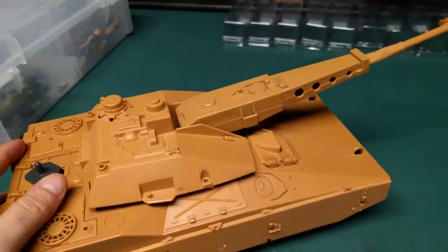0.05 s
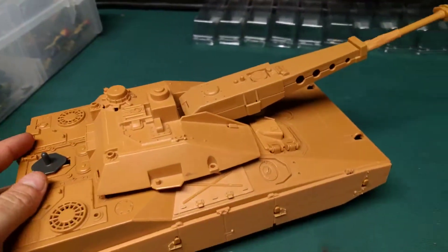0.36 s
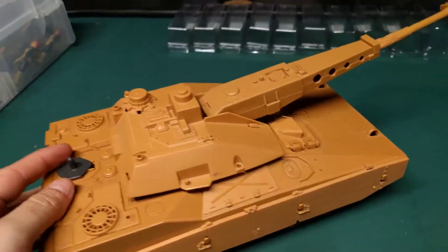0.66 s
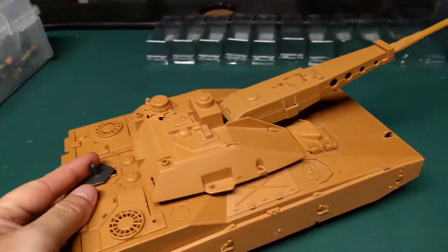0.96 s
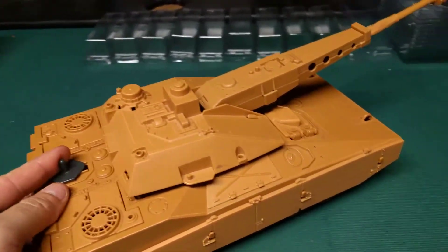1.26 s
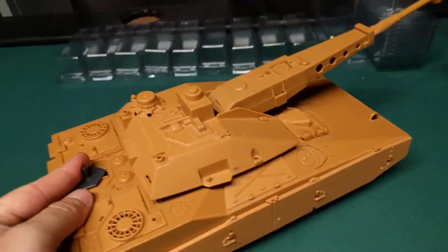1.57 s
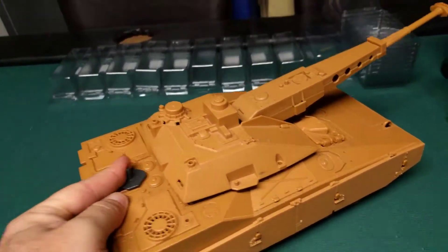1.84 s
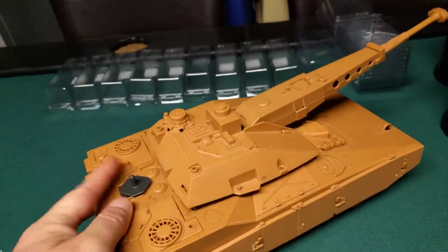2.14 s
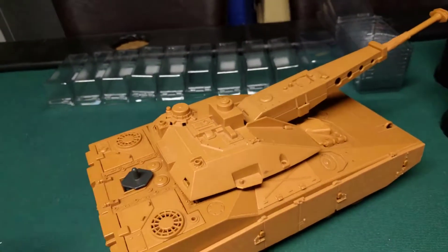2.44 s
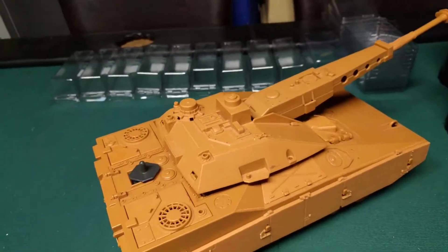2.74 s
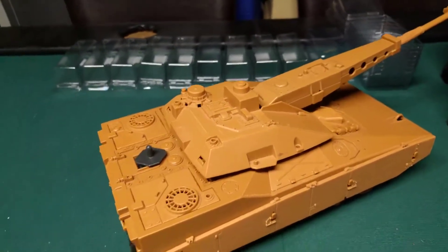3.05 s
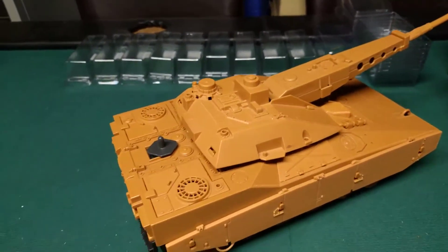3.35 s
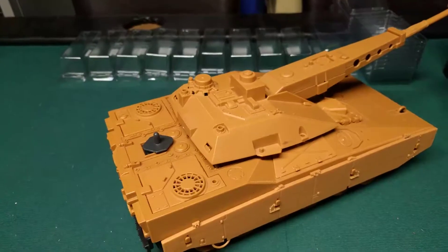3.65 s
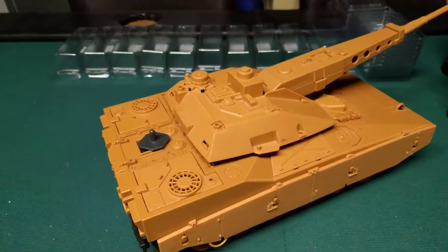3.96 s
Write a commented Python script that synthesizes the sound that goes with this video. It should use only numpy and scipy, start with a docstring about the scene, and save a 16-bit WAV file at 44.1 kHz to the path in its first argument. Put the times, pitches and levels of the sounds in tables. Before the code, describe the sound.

A toy tank's motor whirrs and rattles, then stops with a few plastic clicks.

```python
"""The gearbox of a plastic toy tank, which crawls over a table mat, held back by a hand. Its gear wheel
turns about 50 times a second: the meshes whine at their tooth rates, the tooth impacts excite the hollow
hull, and a tight spot binds and knocks once a turn. The motor is switched off and runs down, the switch
and loose parts click as the hand lets go, and a low room rumble remains."""
import sys
import numpy as np
from scipy import signal
from scipy.fft import rfft, irfft
from scipy.io import wavfile
from scipy.ndimage import uniform_filter1d

SR = 44100
rng = np.random.default_rng(int(sys.argv[2]) if len(sys.argv) > 2 else 0)


def inscribe(sig):
    """Save sig as 16-bit PCM at rate SR to the path in sys.argv[1].

    A 1-D sig is mono; a 2-D sig holds one channel per row.
    Samples are clipped to [-1, 1] before scaling.
    """
    pcm = np.round(np.clip(np.atleast_2d(sig).T, -1, 1) * 32767)
    wavfile.write(sys.argv[1], SR, pcm.astype(np.int16))


N = 176400
T = np.arange(N) / SR


def from_db(db):
    """Amplitude ratio of a level in decibels."""
    return 10 ** (np.asarray(db) / 20)

def rms_one(x):
    """Normalisation to unit rms."""
    return x / np.sqrt(np.mean(x ** 2) + 1e-20)

def in_time(rows):
    """Linear interpolation of each column against the first, t/s."""
    times, *columns = np.transpose(rows)
    return [np.interp(T, times, column) for column in columns]

def gaussian(x, sigma):
    """Gaussian envelope of unit height."""
    return np.exp(-.5 * (x / sigma) ** 2)

def lowpass(x, hz):
    """Second-order Butterworth low-pass."""
    return signal.sosfilt(signal.butter(2, hz, fs=SR, output="sos"), x)

def drift(hz):
    """Random modulation: low-passed noise of unit rms."""
    return rms_one(lowpass(rng.standard_normal(N + SR), hz)[SR:])

def resonate(x, hz, width_hz):
    """Forced response of a damped oscillator, at unit rms."""
    r = np.exp(-np.pi * width_hz / SR)
    feedback = [1, -2 * r * np.cos(2 * np.pi * hz / SR), r * r]
    return rms_one(signal.lfilter([1, 0, -1], feedback, x))

def tail(t60):
    """Free decay of densely spaced modes: exponentially damped noise of unit energy."""
    ring = rng.standard_normal(SR // 2) * from_db(-60 * T[:SR // 2] / t60)
    return ring / np.linalg.norm(ring)

def colour(x, points, modes=(), band_hz=None):
    """Minimum-phase filter through (f/Hz, gain/dB) points, with Lorentzian modes and a pass band."""
    hz = np.maximum(np.arange(N + 1) * SR / (2 * N), 1)
    point_hz, point_db = np.transpose(points)
    db = np.interp(np.log(hz), np.log(point_hz), point_db)
    for centre, width, gain in modes:
        db += gain / (1 + (2 * (hz - centre) / width) ** 2)
    if band_hz:
        loss = (1 + (band_hz[0] / hz) ** 12) * (1 + (hz / band_hz[1]) ** 12)
        db -= 10 * np.log10(np.minimum(loss, 1e7))
    cepstrum = irfft(np.log(from_db(db)))[:N]
    cepstrum[1:] *= 2  # a one-sided cepstrum makes the response causal
    return irfft(rfft(x, 2 * N) * np.exp(rfft(cepstrum, 2 * N)))[:N]


# Spectrum of the room noise: f/Hz, relative spectral level/dB
ROOM_SPECTRUM = [(22, -40), (55, -2), (85, -0.5), (130, -3.5), (200, -7.5), (280, -12.5), (390, -21),
                 (580, -20), (1050, -26), (1700, -28.5), (4200, -35), (9000, -39.5), (15500, -38.5)]
# Dull swells of the rumble: t/s, sigma/s, f/Hz, peak level/dB
ROOM_SWELLS = [(2.914, 0.025, 105, -36), (3.755, 0.017, 126.5, -34), (3.81, 0.03, 119.5, -39.5)]

def room_rumble():
    """Ambient noise: a stationary, bass-heavy spectrum with three faint low tone bursts."""
    out = from_db(-42.5) * rms_one(colour(rng.standard_normal(N), ROOM_SPECTRUM))
    for t, sigma, hz, db in ROOM_SWELLS:
        out += from_db(db) * gaussian(T - t, sigma) * np.sin(2 * np.pi * hz * T + drift(16))
    return out


# Frequency response of the plastic parts: f/Hz, gain/dB
PLASTIC_RESPONSE = [(200, -27), (600, -2), (1900, 0), (3500, 5), (5400, 0.5), (7000, -2), (15500, 1)]

def plastic(excitation, modes=()):
    """Source and filter: the plastic shapes the spectrum of each contact."""
    return colour(excitation, PLASTIC_RESPONSE, modes)

def switch_scrape(grains_per_s=2200):
    """Sliding friction: the switch slides back in a short Poisson train of tiny impacts."""
    grains = (rng.random(N) < grains_per_s / SR) * rng.standard_normal(N)
    friction = rms_one(lowpass(plastic(grains), hz=3480))
    return from_db(-43.5) * gaussian(T - 2.195, sigma=.026) * friction


# Impacts of the switch and loose parts: t/s, relative level/dB, cutoff f/Hz, shell share/1
IMPACTS = [(2.067, 0, 5350, 0), (2.096, 1.5, 2500, 0), (2.152, -1, 3620, 0.05), (2.197, -9.5, 4200, 0.2),
           (2.208, -3.5, 1800, 0), (2.2353, -13.5, 4200, 0.2), (2.2688, -17, 15000, 0),
           (2.3018, -2, 7200, 1), (2.307, -2.5, 6640, 1), (2.334, -13, 4150, 0.5), (2.416, -15.5, 2850, 0)]
# Resonances and a dip of the hollow shell: f/Hz, bandwidth/Hz, gain/dB
SHELL_MODES = [(2960, 200, 10), (3450, 400, -15), (5100, 900, 9.5)]

def clicks(rise_cycles=5.2):
    """Impact excitation: softer contacts are duller and rise more slowly; some ring the shell."""
    plain, shell = np.zeros((2, N + SR))
    for t, db, cutoff_hz, shell_share in IMPACTS:
        hit = tail(t60=.028)
        hit *= 1 - np.exp(-T[:len(hit)] * cutoff_hz / rise_cycles)
        hit = lowpass(hit / np.linalg.norm(hit), cutoff_hz)
        span = slice(int(t * SR), int(t * SR) + len(hit))
        plain[span] += from_db(db + 2.5) * (1 - shell_share) * hit
        shell[span] += from_db(db - 1) * shell_share * hit
    return plastic(plain[:N]) + plastic(shell[:N], SHELL_MODES)


SMALL_TEETH, LARGE_TEETH = 14, 22
BIND_LOW, BIND_HIGH = .26, .17  # fractional extra force at the tight spot

# Hull resonances that flare as the toy moves under the hand:
# t/s, sigma/s, f/Hz, nominal bandwidth/Hz, relative level/dB
HULL_FLARES = [(.35, 0.64, 14200, 1100, -30), (1.74, .25, 14800, 890, -29.5), (1.83, 0.19, 1463, 60, -35.5),
               (1.92, 0.049, 4410, 380, -23)]

def hull_flares(bind):
    """Resonance driven by friction: narrow bands of rubbing noise swell and fade."""
    out = np.zeros(N)
    for t, sigma, hz, width, db in HULL_FLARES:
        rub = rng.standard_normal(N) * (1 + BIND_LOW * bind)
        ring = resonate(resonate(rub, hz, 2 * width), hz, 2 * width)
        out += from_db(db) * gaussian(T - t, sigma) * ring
    return out


# Shifts of the hull's response under the hand: bandwidth/Hz, duration/s, rms depth/dB
HULL_SHIFTS = [(80, .14, 2.2), (400, .07, .8)]

def shift_resonances(x):
    """Time-varying filter: random peaks and dips come and go, shallower below 2500 Hz."""
    hz, times, spectrum = signal.stft(x, SR, nperseg=2048, noverlap=1536)
    taper = np.minimum(hz / 2500, 1)[:, None]
    for width_hz, length_s, depth_db in HULL_SHIFTS:
        ripple = rng.standard_normal(spectrum.shape)
        for axis, size in 2 * [(0, round(width_hz / hz[1])), (1, round(length_s / times[1]))]:
            ripple = uniform_filter1d(ripple, size, axis=axis, mode="wrap")
        spectrum = spectrum * from_db(depth_db * rms_one(ripple) * taper)
    return signal.istft(spectrum, SR, nperseg=2048, noverlap=1536)[1][:N]

def knocks(turns, speed, jitter_s=.00018, spread_db=2.5):
    """Periodic shock: once a turn the tight spot jolts the hull into a tone burst; unit rms."""
    turn = turns.astype(int)
    pitch, strength, lateness = rng.standard_normal((turn[-1] + 1, 3))[turn].T
    since = (turns % 1 - .5) / speed - jitter_s * lateness
    hz = 1192 + 91 * pitch
    burst = gaussian(since, sigma=.0017) * np.sin(2 * np.pi * hz * since)
    return rms_one(burst * from_db(spread_db * strength))

def contacts(turns, jitter_s=.00012, rattles_per_s=2000, spots=10):
    """Superposition of tooth strikes, rattles and rubbing; each spot struck has its own hull ring."""
    onsets = np.flatnonzero(np.diff(np.floor(turns * LARGE_TEETH)))
    lateness, strike_db = rng.standard_normal((len(onsets), 2)).T
    onsets += (lateness * jitter_s * SR).astype(int)
    teeth = np.zeros(N)
    teeth[np.clip(onsets, 0, N - 1)] = from_db(strike_db)
    rattling = rng.random(N) < rattles_per_s / SR
    rattle_db = 5 * np.minimum(rng.standard_normal(N), 2)
    rattles = rattling * from_db(rattle_db) * rng.choice([-1, 1], N)
    hits = rms_one(teeth - teeth.mean()) + .77 * rms_one(rattles)
    spot = rng.integers(0, spots, N)
    ring = sum(signal.fftconvolve(hits * (spot == k), tail(t60=.028))[:N] for k in range(spots))
    rubbing = .4 * rng.standard_normal(N)
    return hits + ring + rubbing


# Frequency response of the hull: f/Hz, gain/dB
HULL_RESPONSE = [(240, -70.5), (400, -19), (470, -26.5), (615, -14), (685, -8), (740, -13.5), (787, -5),
                 (850, -12), (976, -7), (1070, -9), (1160, -7), (1290, -4.5), (1780, -18.5), (2140, -13.5),
                 (2570, -14.5), (3550, -11.5), (3960, -14.5), (4410, -11.5), (7100, -18), (10600, -17),
                 (11600, -20), (14200, -13), (15800, -18)]
# Resonances of the hull: f/Hz, bandwidth/Hz, gain/dB
HULL_RESONANCES = [(776, 54, 3), (898, 48, 6.5), (2190, 170, 0), (2408, 38, 4.5), (2667, 38, 7),
                   (2970, 86, 4.5), (3440, 35, 3), (4320, 380, 2), (10500, 200, 1.5)]

def clatter(turns, bind, levels_db):
    """Forced vibration: the hull radiates the fluttering contact force in three frequency bands."""
    force = shift_resonances(contacts(turns)) * from_db(.62 * drift(40))
    bands_hz = [(480, 1700), (1700, 7000), (7000, 16500)]
    out = np.zeros(N)
    for db, band, extra in zip(levels_db, bands_hz, (BIND_LOW, BIND_HIGH, BIND_HIGH)):
        radiated = colour(force * (1 + extra * bind), HULL_RESPONSE, HULL_RESONANCES, band)
        surge_db = .2 * drift(18)
        out += from_db(db + surge_db) * rms_one(radiated)
    return out


# Whine of the two meshes: t/s, relative level/dB of the small gear and of the large gear
MESH_LEVELS = [(0, -35, -30), (.22, -34, -46), (.32, -38, -29.5), (.8, -36, -27.5), (.92, -39, -33.5),
               (1.17, -35, -32.5), (1.27, -38.5, -23.5), (1.91, -36.5, -24.5), (2.02, -41.5, -43),
               (2.09, -56, -54)]

def mesh_whine(turns, bind, wobble_rad=.37, roughness=.31):
    """Mesh tones at tooth count times rotation rate; uneven timing and force modulate them."""
    turns = turns + .004 * drift(16.3)
    small_db, large_db = in_time(MESH_LEVELS)
    out = np.zeros(N)
    for teeth, db, extra in ((SMALL_TEETH, small_db, 0), (LARGE_TEETH, large_db, .6)):
        tone = np.sin(2 * np.pi * teeth * turns + wobble_rad * drift(90))
        force = 1 + roughness * drift(137) + extra * bind
        out += from_db(db) * rms_one(tone * force)
    return out


# Rotation rate of the gear wheel: t/s, f/Hz
WHEEL_SPEED = [(0, 50.4), (.2, 50.5), (.3, 49.2), (.45, 50.0), (.7, 50.0), (.82, 50.4), (.92, 49.4),
               (1.19, 49.7), (1.29, 48.1), (1.36, 49.2), (1.57, 49.3), (1.62, 50.2), (1.8, 48.1),
               (1.89, 47.6), (1.95, 46.0), (2.05, 46.5)]
# Strength of the clatter: t/s, relative level/dB of the low, middle and top band
CLATTER_LEVELS = [(0, -28, -22, -26.5), (.4, -29.5, -22, -26), (.85, -28.5, -23.5, -26),
                  (1.15, -28, -22.5, -24.5), (1.83, -29.5, -23, -24.5), (1.955, -31.5, -21.5, -23),
                  (2.035, -39, -35, -43), (2.1, -38, -38.5, -47), (2.125, -46, -43, -59)]

def gearbox(stop_s=2.147, fade_s=.091):
    """Gear noise: one angle of rotation times the clatter, knocks and whine until the wheel rests."""
    speed, = in_time(WHEEL_SPEED)
    turns = np.cumsum(speed) / SR
    bind = gaussian(turns % 1 - .5, sigma=.047) * (1 + .076 * drift(14))  # tight spot at mid-turn
    low_db, middle_db, top_db = in_time(CLATTER_LEVELS)
    running = from_db(np.minimum(middle_db - middle_db[0], 0))  # the flares fade with the clatter
    out = clatter(turns, bind, (low_db, middle_db, top_db))
    out += from_db(low_db - 1.8) * knocks(turns, speed)
    out += running * hull_flares(bind)
    out += mesh_whine(turns, bind)
    return from_db(5) * out * np.clip((stop_s - T) / fade_s, 0, 1)


def scene():
    """Superposition in mono: the toy close by, with small-room reverberation on clicks and scrape."""
    handling = clicks() + switch_scrape()
    reverberation = from_db(-11) * signal.fftconvolve(handling, tail(t60=.16))[:N]
    return np.tile(gearbox() + handling + reverberation + room_rumble(), (2, 1))

def record(dry, window_s=.04, threshold_db=-35, slope=.24, cutoff_hz=15850):
    """Dynamic compression turns loud passages down; a steep low-pass limits the bandwidth."""
    power = uniform_filter1d(dry[0] ** 2, int(window_s * SR))
    level_db = 10 * np.log10(np.maximum(power, 1e-12))
    out = dry * from_db(-slope * np.maximum(level_db - threshold_db, 0))
    return signal.fftconvolve(out, signal.firwin(601, cutoff_hz, fs=SR)[None], "same")


dry = scene()
out = record(dry)
inscribe(out)
```